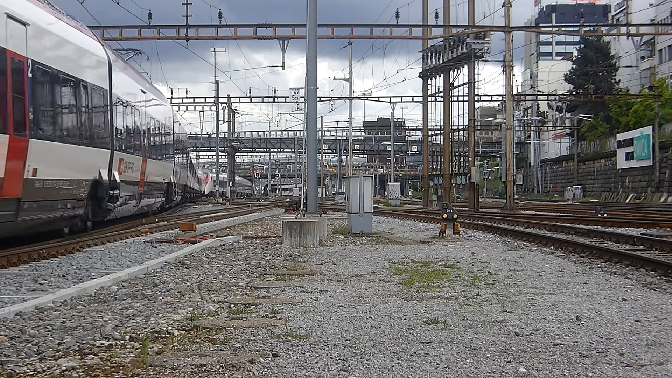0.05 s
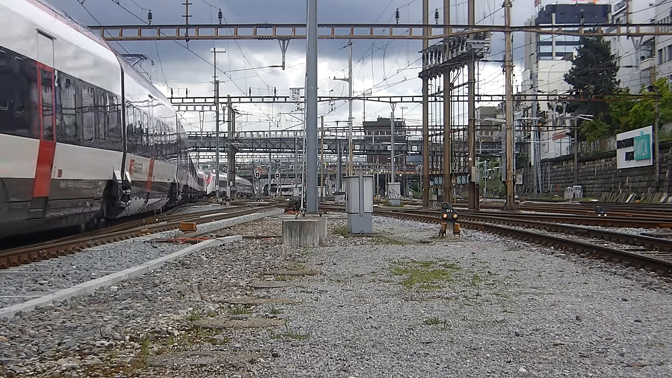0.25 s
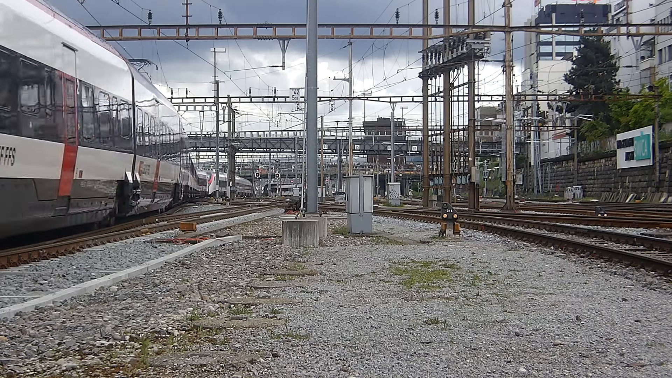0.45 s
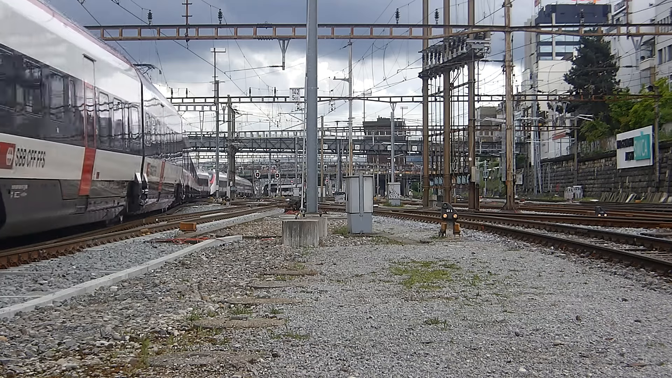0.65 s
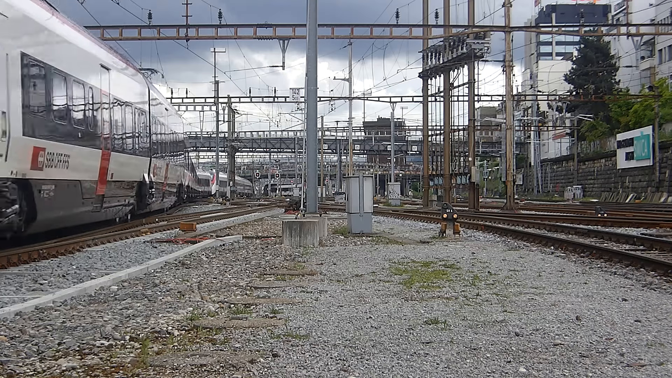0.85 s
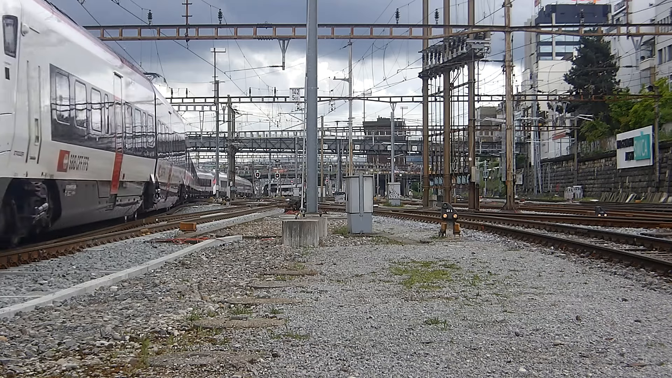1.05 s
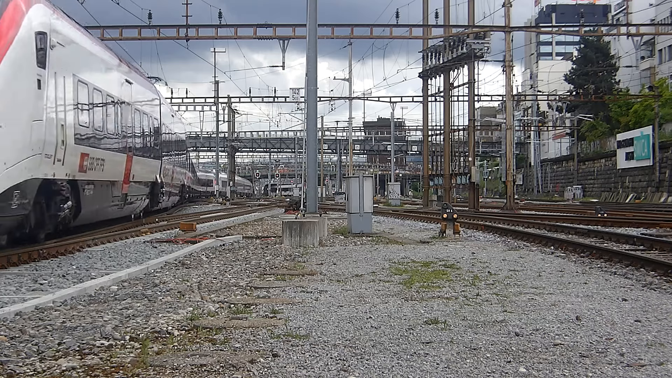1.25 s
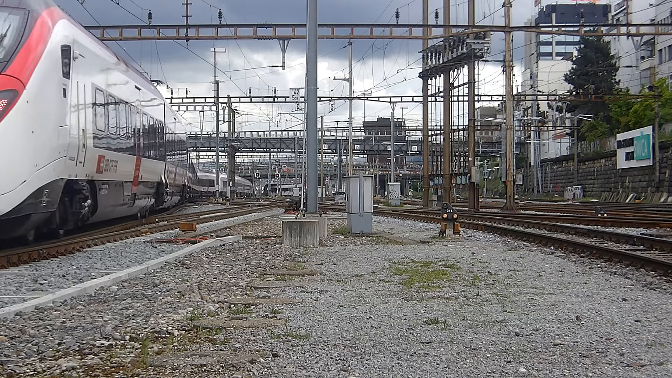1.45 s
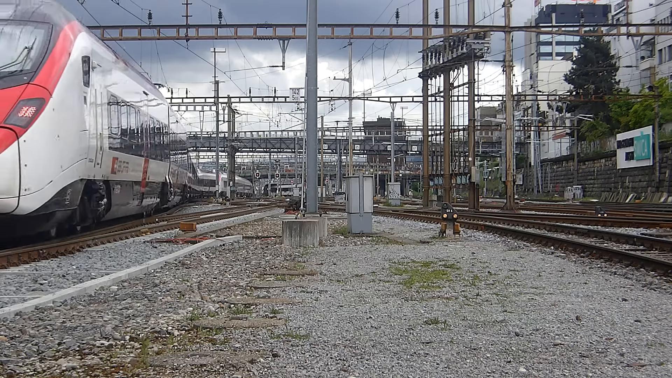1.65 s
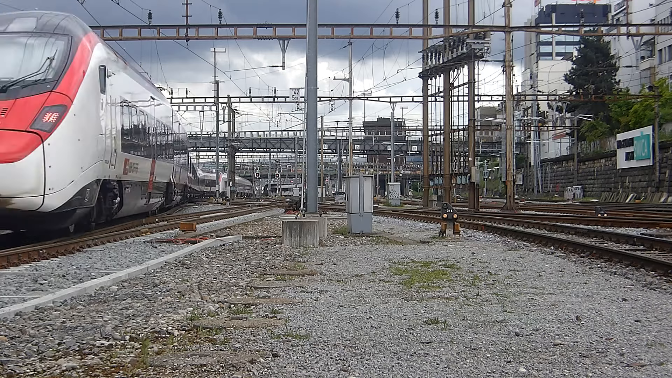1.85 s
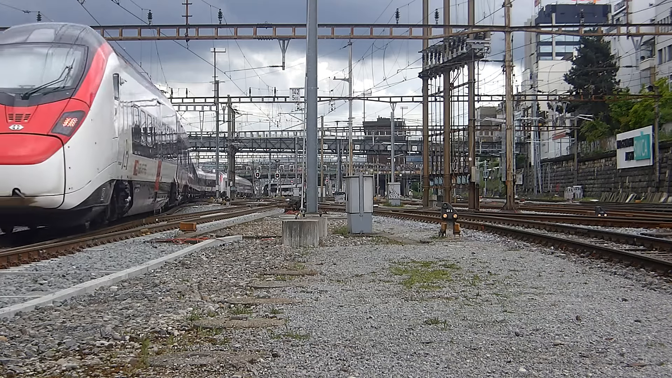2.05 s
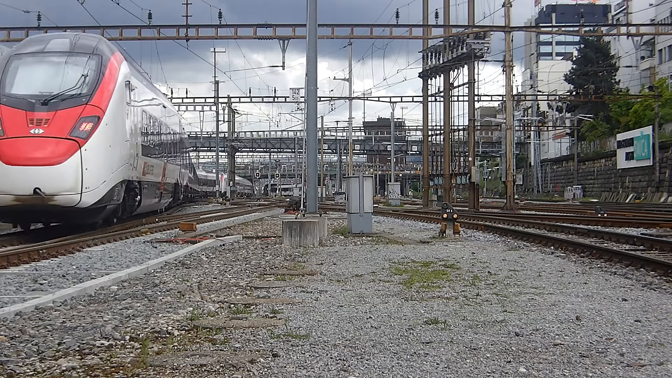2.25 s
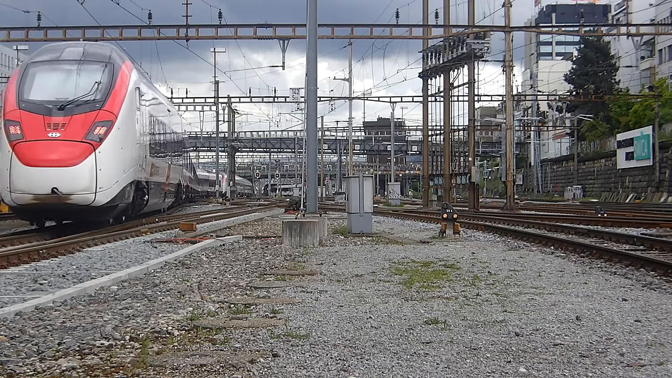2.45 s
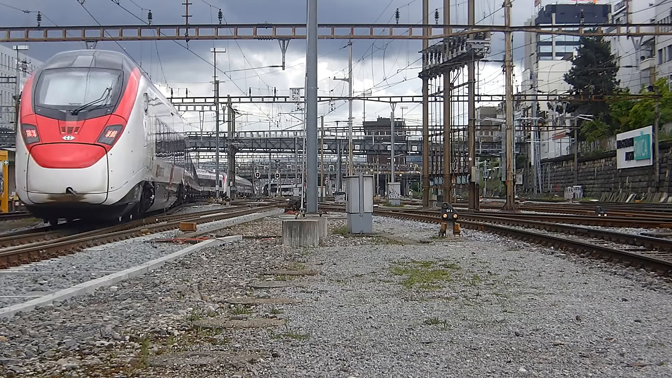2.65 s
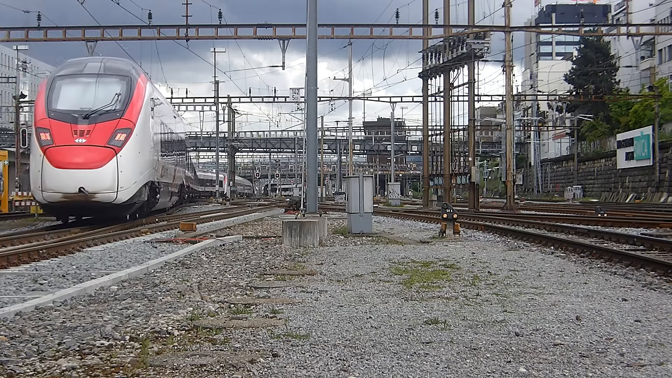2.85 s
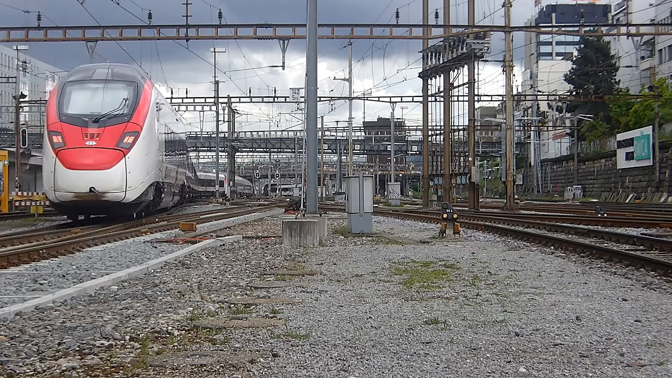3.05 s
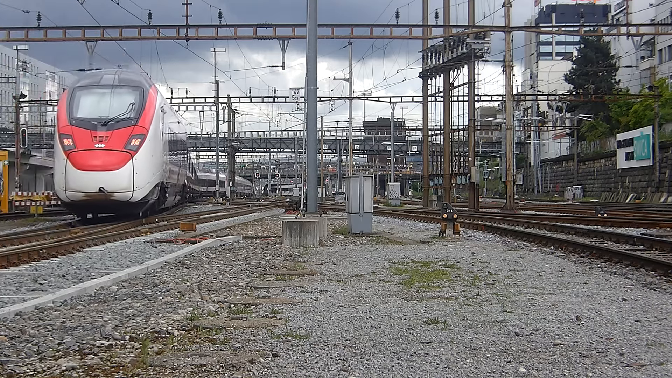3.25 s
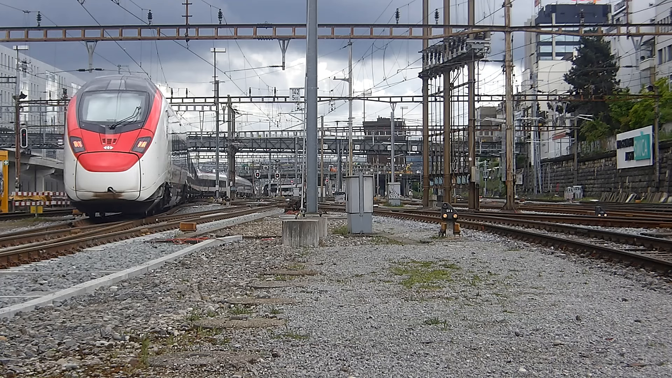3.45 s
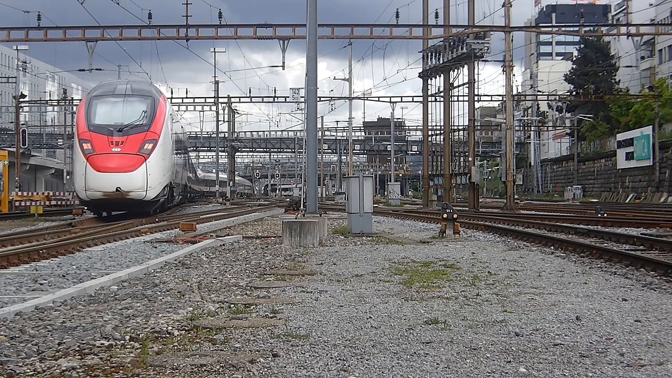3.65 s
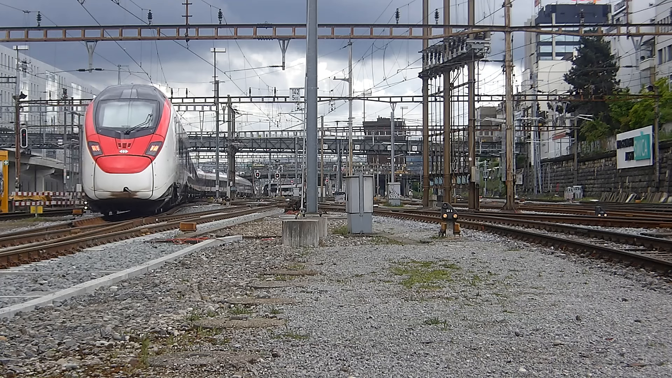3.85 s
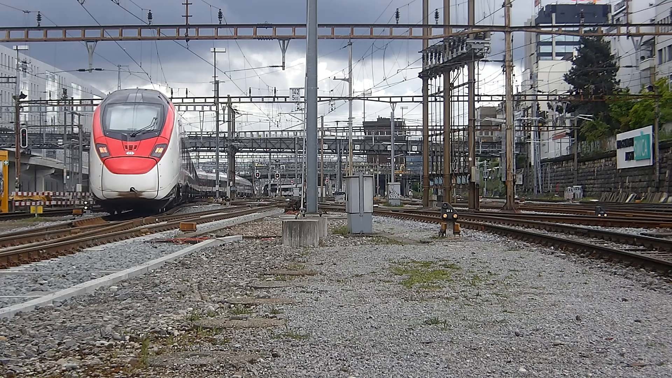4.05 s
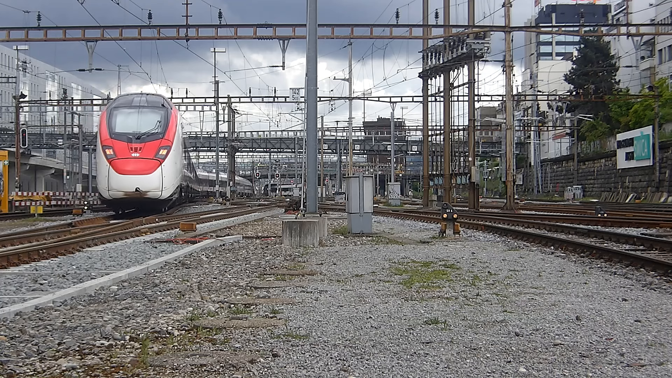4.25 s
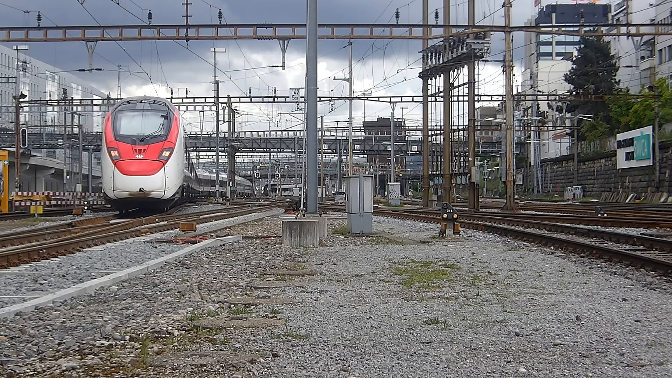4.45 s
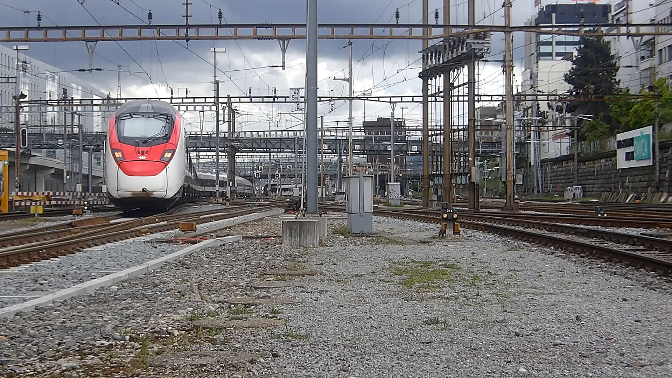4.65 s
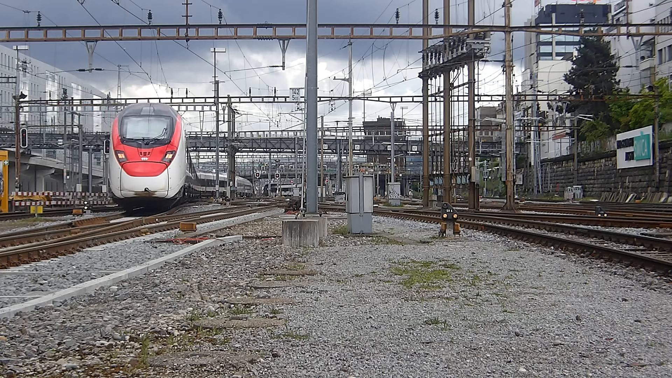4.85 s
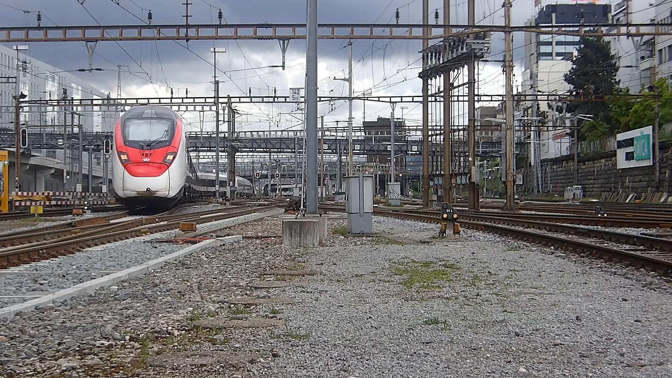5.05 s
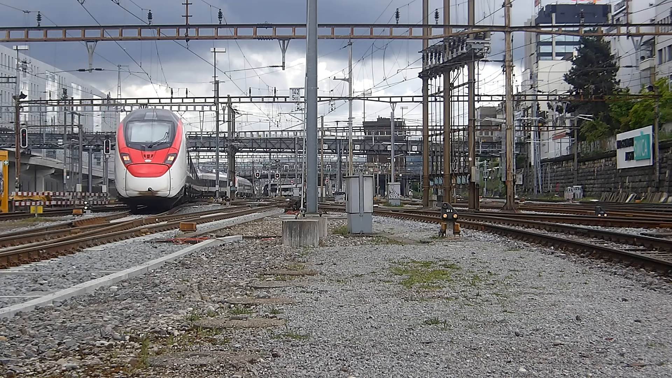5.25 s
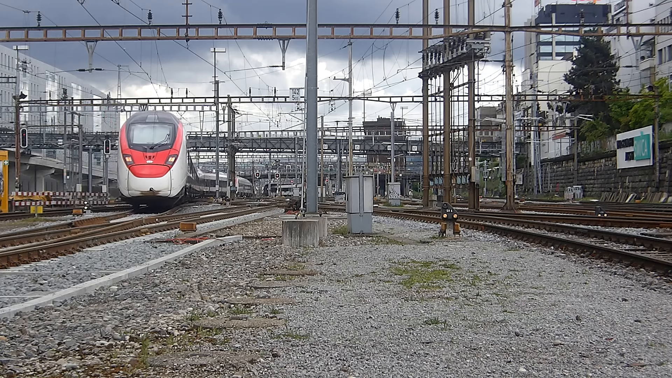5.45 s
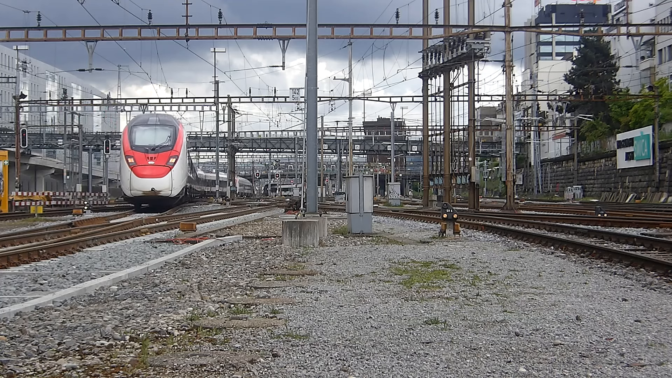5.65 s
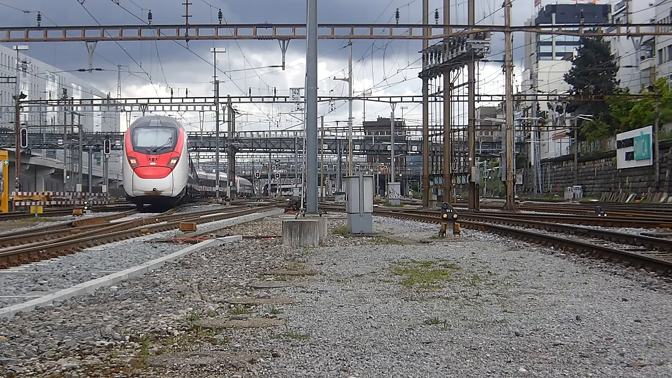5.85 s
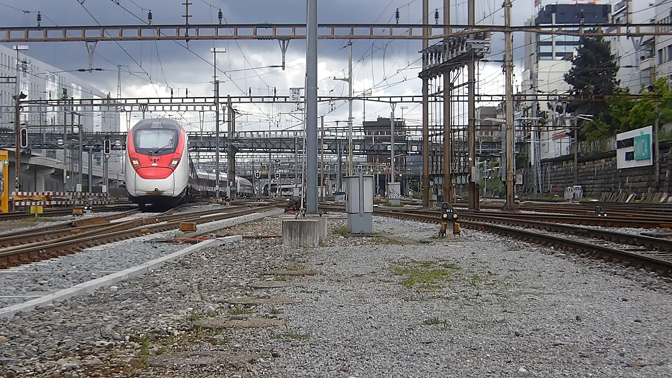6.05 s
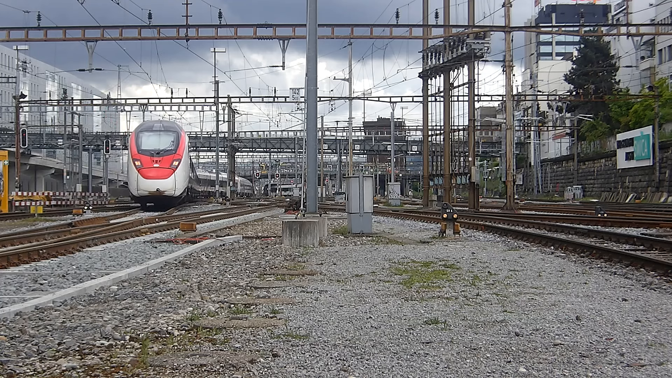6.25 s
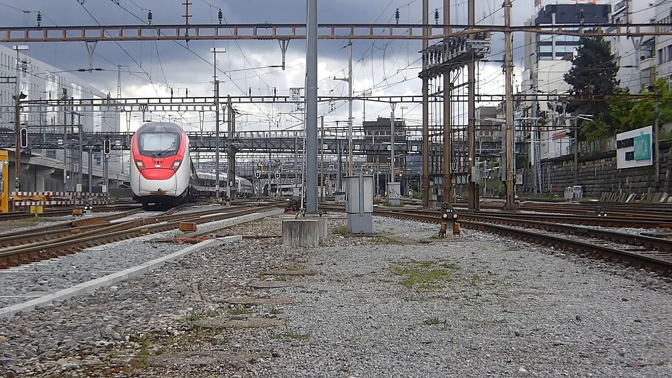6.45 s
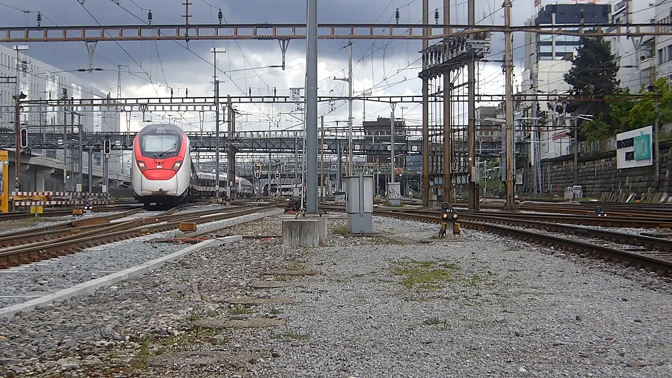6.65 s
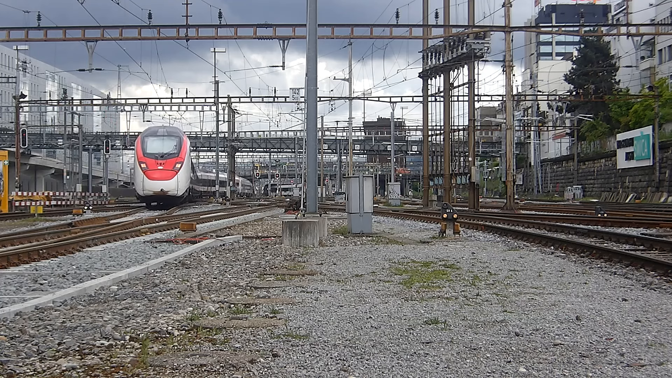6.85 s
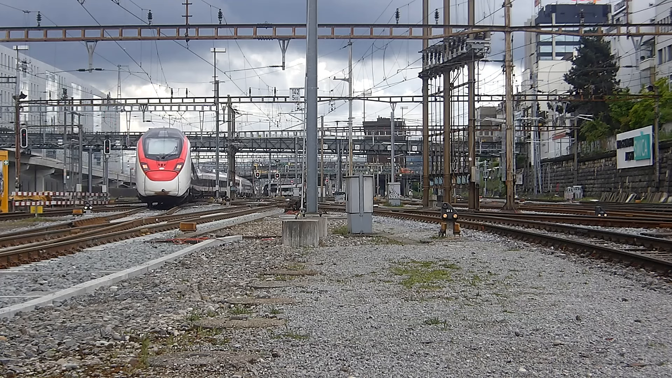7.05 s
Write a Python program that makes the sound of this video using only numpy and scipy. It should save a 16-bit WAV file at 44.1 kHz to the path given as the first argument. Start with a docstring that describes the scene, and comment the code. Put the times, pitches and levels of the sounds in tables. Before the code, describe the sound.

Close outdoors in a rail yard, a train leaves with its wheels shrieking and ringing against curved rails over a rough rumble. A rapid clatter of thuds and clacks comes almost at once, another near three seconds. The squeal drops briefly, returns in a shorter burst around four seconds, then dies away to low rolling noise and faint hiss. Fixed trackside microphone, same sound in both channels.

```python
"""A station yard with curved points, where an electric passenger train rolls close by and draws away.
Flanges grind on the rail as patchy coloured noise; steel wheels ring and shriek as friction-driven modes.
Rough treads rumble underneath, and single modes now and then sing out as purer squeals.
Axles thud and clack over joints with echoes from the yard; distant blows come along the rail as
falling chirps, all over a faint even hiss."""
import sys
import numpy as np
from scipy import signal
from scipy.fft import rfft, irfft
from scipy.io import wavfile
from scipy.ndimage import uniform_filter1d

SR = 44100
rng = np.random.default_rng(int(sys.argv[2]) if len(sys.argv) > 2 else 0)


def wav_record(signal):
    """Record a signal, one row per channel, as 16-bit PCM in the file named by sys.argv[1]."""
    frames = np.transpose(np.atleast_2d(signal))
    bounded = np.clip(frames, -1, 1)
    # unit amplitude maps onto the largest positive 16-bit level
    quanta = np.round(bounded * 32767).astype(np.int16)
    wavfile.write(sys.argv[1], SR, quanta)


N = 313110
TIME = np.arange(N) / SR

# a flange presses on the rail: [start t/s, end t/s, easing off from start to end/dB (negative swells),
# rasp level/dB, hiss level/dB, fizz level/dB, ring level/dB, top ring level/dB, shriek level/dB]
FLANGE_CONTACTS = [(-0.3, 0.42, -1, -30.5, -36.5, -34.5, -28.5, -28.5, -17.5),
                   (0.33, 0.44, -5, -32.5, -30, -29.5, -24, -18, -41),
                   (0.40, 2.797, 0, -30.5, -38, -33, -25.5, -29, -21.5),
                   (2.15, 3.305, 3, -31, -66, -55.5, -31, -29, -30),
                   (3.81, 3.93, -12.5, -32.5, -55, -39, -50, -50, -40),
                   (3.874, 4.65, 9, -27.5, -38.5, -39, -25.5, -31, -31),
                   (4.05, 4.967, 6, -29, -41, -65, -29.5, -29.5, -32.5)]
# how contacts die away once the flange lets go: [f/Hz, t60/s]
RELEASE_TIMES = [(2000, 1.93), (5500, 1), (9500, 0.77), (14000, .85)]
# where rasp, hiss and fizz are centred: [f/Hz]
GRIND_CENTRES = [2770, 6000, 13350]
# colour of the grinding, added to the contact levels: [f/Hz, level per Hz/dB]
GRIND_TINT = [(600, -61), (1300, -40), (1620, -45.5), (1850, -33), (3100, -34.5), (4200, -35), (6100, -33),
              (7300, -32), (8200, -41), (8700, -27), (10500, -27), (12200, -29), (13500, -37), (15700, -45)]
# modes of the wheel discs: [f/Hz, width/Hz, level relative to the drive/dB]
WHEEL_MODES = [(392.2, 8.3, -11), (574.3, 20, -14), (1009.3, 50, -2.5), (2007, 100, 7), (2920, 250, -10),
               (3684, 140.4, -7.5), (4655, 181, -7), (5657, 170, -7.5), (6644, 147, -4), (7590, 160, -12),
               (8650, 200, -6.5), (10450, 210, -7), (11370, 210, -12.5), (12350, 130, -20),
               (13000, 100, -26), (13965, 30, -26), (15080, 31, -47.5)]
# where low modes end, middle ones begin and end, and top ones begin: [f/Hz]
RING_ZONES = [1950, 2905, 6900, 8400]
# drive of the wheel modes from plain rolling: [f/Hz, level/dB]
ROLLING_DRIVE = [(1000, -47), (2000, -62), (3650, -43), (4660, -46.5), (5650, -51.5), (6600, -59),
                 (7600, -68), (8600, -83)]
# cluster of close modes in the shriek: [f/Hz, width/Hz, relative level/dB]
SHRIEK_MODES = [(9418, 8.6, -7), (9476, 20, -5), (9570, 195, -3), (9630, 25, -9), (9750, 25, -13)]
# one wheel mode catches and sings out: [peak t/s, time from peak to half amplitude t/s, f/Hz, level/dB]
SQUEAL_EVENTS = [(0.394, .04, 382, -28.5), (0.45, 0.166, 988, -35), (0.483, 0.153, 9450, -22.5),
                 (0.517, 0.1, 4653, -23.5), (0.559, 0.25, 5663, -24), (0.625, 0.066, 574, -34.5),
                 (0.784, 0.12, 1015, -38.5), (.9, 0.43, 2060, -37.5), (1.05, 0.55, 6620, -31.5),
                 (1.472, 0.14, 5630, -28), (2.2, 0.36, 6540, -30.5), (2.415, 0.84, 2949, -32),
                 (2.5, 0.55, 3645, -33), (2.525, .2, 994, -40.5), (2.92, .25, 5650, -34.5),
                 (2.993, 0.13, 1000, -36), (3.3, 0.046, 6660, -30.5), (3.929, 0.057, 2900, -38),
                 (4.037, 0.071, 4656, -25), (4.25, 0.11, 7670, -34), (4.313, 0.22, 5650, -29.5),
                 (4.335, 0.28, 991.5, -34), (4.337, 0.099, 3650, -28.5), (4.462, 0.35, 1993, -32),
                 (4.696, 0.088, 4650, -31), (4.707, 0.15, 3630, -30), (5.795, 1, 1003, -47.5),
                 (6.202, 0.55, 6650, -56), (6.56, 0.071, 1000, -44), (6.85, 0.26, 4664, -51)]
# course of the rolling noise: [t/s, level/dB]
ROLLING_LEVEL = [(0.0, -36), (0.25, -39), (0.5, -38), (0.97, -45.5), (1.72, -41.5), (2.65, -45),
                 (3.05, -38), (3.7, -39.5), (4.4, -41.5), (7.1, -43)]
# colour of the rumble, added to that course: [f/Hz, level per Hz/dB]
RUMBLE_TINT = [(25, -54.5), (50, -44), (80, -36.5), (115, -37.5), (200, -24), (310, -27.5), (420, -26),
               (750, -30), (1250, -31.5), (1700, -32.5), (2500, -38), (4200, -46), (7800, -71.5),
               (9400, -54.5), (15000, -77)]
# wheels striking joints and points: [t/s, thud level/dB, thud f/Hz, clack level/dB]
JOINT_BLOWS = [(.309, -16, 490, -42), (.322, -21, 420, -27), (.336, -18.5, 290, -35),
               (0.356, -22.5, 576, -42), (.372, -19, 528, -29), (0.387, -23, 407, -21.5),
               (0.412, -26, 390, -23.5), (0.429, -24, 407, -24.5), (.534, -32, 312, -49),
               (2.946, -21, 457, -17.5), (2.955, -20, 727, -24), (2.968, -31, 650, -29),
               (2.987, -32, 800, -22), (3.014, -29, 800, -18.5), (3.026, -34, 595, -25),
               (3.05, -43, 498, -32), (3.486, -33.5, 252, -55), (3.626, -52, 520, -29.5),
               (3.660, -42, 511, -29), (3.695, -48, 530, -30.5)]
# track modes in the thud: [f/Hz, width/Hz, relative level/dB]
THUD_MODES = [(269, 22, -2), (390, 13, -4), (543, 110, 5), (895, 350, 1.5)]
# track modes in the steel clack: [f/Hz, width/Hz, relative level/dB]
CLACK_MODES = [(2020, 550, 0.5), (2470, 85, 0.5), (2714, 29, -2.5), (2950, 540, -2.5), (3200, 45, -5)]
# distant blows heard through the rail: [t/s, level/dB, time constant of the fall t/s]
RAIL_CHIRPS = [(3.829, -57, 0.044), (5.56, -57, .15), (5.598, -55, 0.16)]

# friction builds up quickly, the wheel's ringing more slowly
GRIND_RISE_S, RING_RISE_S = 0.064, 0.18
# the rail carries treble fastest: a note two octaves under FIRST_HZ starts LAG_S later
FIRST_HZ, LAG_S = 14600, 0.045
# the lowest modes take this much less from the flange than the middle ones
LOW_MODES_DB = -26
# the contact point wanders and feeds each mode more or less
DRIFT_DB, DRIFT_HZ = 0.9, 2.4
# ringing from plain rolling fades once the last coach has drawn away
AWAY_S, AWAY_DB_PER_S = 6, 3
# a squeal is a thin line in a blur: the blur takes this share of the mode's usual width,
# and its level is relative to the line
LINE_WIDTH_HZ, BLUR_WIDTH_SHARE, BLUR_DB = 16.4, 0.7, 1
# cutoff of the clack's low-pass
CLACK_TOP_HZ = 4140
FLOOR_DB, EDGE_HZ = -59, 15750


def gain_of(db):
    """Turns decibels into an amplitude factor."""
    return 10 ** (np.asarray(db) / 20)


def evened(x):
    """Scales a signal to an rms of one."""
    return x / np.sqrt(np.mean(x ** 2) + 1e-20)


def read(points, hz):
    """Reads a curve over frequency on a logarithmic axis."""
    f, value = np.transpose(points)
    return np.interp(np.log(hz + 1), np.log(f + 1), value)


def add(mix, s, sound):
    """Mixes a sound in at time s, cut off at the end of the mix."""
    part = mix[max(round(s * SR), 0):][:len(sound)]
    part += sound[:len(part)]


def wander(rate_hz):
    """Slow random drift of rms one, rolling off above the given rate."""
    control_rate, size = 500, 4096
    hz = np.fft.rfftfreq(size, 1 / control_rate)
    spectrum = rfft(rng.standard_normal(size)) / (1 + (hz / rate_hz) ** 2)
    slow = irfft(spectrum)
    return evened(np.interp(TIME, np.arange(size) / control_rate, slow))


def resonate(x, hz, width):
    """One resonance; a second, wider pass steepens its far skirts."""
    for band in (width, 8 * width):
        b, a = signal.iirpeak(min(hz, SR / 2 - 1), hz / min(band, SR / 8), SR)
        x = signal.lfilter(b, a, x)
    return x


def noise(field_db, patchy_db, flicker_db, size):
    """Noise whose dB per Hz follow field_db(t, hz), with drifting patches and a shared flicker."""
    hop = size // 4
    t = np.arange(N // hop + 5) * hop / SR
    hz = np.fft.rfftfreq(size, 1 / SR)
    real, imaginary, patches = rng.standard_normal((3, len(t), len(hz)))
    patches = uniform_filter1d(patches, size=10, axis=0)
    patches = evened(uniform_filter1d(patches, size=7, axis=1))
    flicker = evened(uniform_filter1d(rng.standard_normal((len(t), 1)), size=4, axis=0))
    level_db = field_db(t, hz) + patchy_db * patches + flicker_db * flicker
    frames = (real + 1j * imaginary) * gain_of(level_db)
    sound = signal.istft(frames.T, nperseg=size, noverlap=size - hop)[1][:N]
    return sound * np.sqrt(SR / size)


def pressed(t, hz, start, end, easing_db, rise_s):
    """Gain of one flange contact: it sets in treble first, eases off along its length, and rings out."""
    arrival = start + LAG_S * (np.sqrt(FIRST_HZ / np.maximum(hz, 3000)) - 1)
    attack = np.clip((t - arrival) / rise_s, 0, 1) ** 2
    hold_db = easing_db * np.interp(t, [start, end], [0.5, -0.5])
    release_db = -60 * np.maximum(t - end, 0) / read(RELEASE_TIMES, hz)
    return attack * gain_of(hold_db + release_db)


def grinding():
    """Flanges scrape the rail head; the powers of all contacts add."""
    def field_db(t, hz):
        power = 0
        for start, end, easing_db, rasp_db, hiss_db, fizz_db, *_ in FLANGE_CONTACTS:
            scrape_db = np.interp(hz, GRIND_CENTRES, [rasp_db, hiss_db, fizz_db])
            pressure = pressed(t[:, None], hz, start, end, easing_db, GRIND_RISE_S)
            power = power + (gain_of(scrape_db) * pressure) ** 2
        return 10 * np.log10(power + 1e-20) + read(GRIND_TINT, hz)
    return noise(field_db, patchy_db=1.46, flicker_db=0.5, size=512)


def rubbed(hz, width, flutter_db):
    """A mode driven by stick and slip: friction caps its swing, so its strength only flutters."""
    tone = resonate(rng.standard_normal(N), hz, width)
    swing = np.sqrt(abs(uniform_filter1d(tone ** 2, size=3000)) + 1e-20)
    return evened(tone / swing * gain_of(flutter_db * wander(rate_hz=6.3)))


def wheel_voice(hz, width):
    """Many wheels blur a mode; the nearest few, each worn a little differently, add thin lines."""
    nearest = np.zeros(N)
    for side in (-1, 0, 1):
        line = rubbed(hz + side * 0.441 * width, 0.051 * width, flutter_db=3.5)
        nearest += gain_of(-5 * abs(side)) * line
    blur = rubbed(hz, width, flutter_db=2.0)
    return evened(blur + gain_of(-4.5) * evened(nearest))


def wheels():
    """Rolling rings the wheel discs faintly, a pressing flange loudly; the powers of both add."""
    t, out = TIME[::100], np.zeros(N)  # coarse time grid for the slow envelopes
    away_db = -AWAY_DB_PER_S * np.maximum(t - AWAY_S, 0)
    for hz, width, db in WHEEL_MODES:
        power = gain_of(read(ROLLING_DRIVE, hz) + away_db) ** 2
        for start, end, easing_db, *_, ring_db, top_db, _ in FLANGE_CONTACTS:
            zone_levels = [ring_db + LOW_MODES_DB, ring_db, ring_db, top_db]
            drive = gain_of(np.interp(hz, RING_ZONES, zone_levels))
            power += (drive * pressed(t, hz, start, end, easing_db, RING_RISE_S)) ** 2
        envelope = np.interp(TIME, t, np.sqrt(power))
        drift_db = DRIFT_DB * wander(rate_hz=DRIFT_HZ)
        out += gain_of(db + drift_db) * envelope * wheel_voice(hz, width)
    return out


def shriek():
    """The piercing top squeal: close modes of several wheels beat against each other."""
    cluster = sum(gain_of(db) * rubbed(hz, width, flutter_db=3.0) for hz, width, db in SHRIEK_MODES)
    lowest_hz = SHRIEK_MODES[0][0]
    power = np.zeros(N)
    for start, end, easing_db, *_, db in FLANGE_CONTACTS:
        power += (gain_of(db) * pressed(TIME, lowest_hz, start, end, easing_db, RING_RISE_S)) ** 2
    return np.sqrt(power) * evened(cluster)


def squeals():
    """Stick and slip locks on to one mode of one wheel: a purer tone swells and fades."""
    out, widths = np.zeros(N), np.array(WHEEL_MODES)[:, :2]
    for s, half_length, hz, db in SQUEAL_EVENTS:
        line = rubbed(hz, LINE_WIDTH_HZ, flutter_db=1.1)
        blur_width = BLUR_WIDTH_SHARE * read(widths, hz)
        blur = evened(resonate(rng.standard_normal(N), hz, blur_width))
        voice = evened(line + gain_of(BLUR_DB) * blur)
        swell = np.exp2(-((TIME - s) / half_length) ** 2)
        out += gain_of(db) * swell * voice
    return out


def rolling():
    """Rough treads on rough rail: a broad rumble whose deep bass hardly changes as the train leaves."""
    def field_db(t, hz):
        s, course_db = np.transpose(ROLLING_LEVEL)
        level_db = np.interp(t, s, course_db)[:, None]
        steadiness = np.interp(hz, [70, 220], [0.8, 0])
        steadied_db = level_db + steadiness * (level_db.mean() - level_db)
        return steadied_db + read(RUMBLE_TINT, hz)
    return noise(field_db, patchy_db=1.5, flicker_db=0.5, size=2048)


def bump(hz, cycles=1.48):
    """The heavy axle drops onto its sleeper: a few low cycles that swell and die."""
    turns = hz * np.arange(SR // 4) / SR
    swell = turns / cycles * np.exp(1 - turns / cycles)
    return np.sqrt(2) * swell * np.sin(2 * np.pi * turns)


def blow(modes, contact_s):
    """A brief rattling contact rings a set of modes; its loudest moment has an rms of one."""
    t = np.arange(SR // 4) / SR
    forces = rng.standard_normal((len(modes), len(t))) * np.exp(-t / contact_s)
    ring = np.zeros(len(t))
    for force, (hz, width, db) in zip(forces, modes):
        ring += gain_of(db) * evened(resonate(force, hz, width))
    return ring / np.sqrt(uniform_filter1d(ring ** 2, size=220).max())


def joints():
    """Each blow thuds in the sleepers and clacks in the steel."""
    out = np.zeros(N)
    b, a = signal.butter(2, CLACK_TOP_HZ, fs=SR)
    for s, thud_db, thud_hz, clack_db in JOINT_BLOWS:
        thud = 0.8 * bump(thud_hz) + 0.4 * blow(THUD_MODES, contact_s=0.005)
        clack = signal.lfilter(b, a, blow(CLACK_MODES, contact_s=0.0047))
        add(out, s, gain_of(thud_db) * thud + gain_of(clack_db) * clack)
    return out


def yard(x, t60=0.5):
    """Scattered echoes from the coaches, masts and retaining wall, dying away by 60 dB in t60 seconds."""
    t = np.arange(SR) / SR
    scattered = rng.standard_normal(SR) * (rng.random(SR) < 2000 / SR)  # about 2000 echoes a second
    taps = scattered * (t > 0.012) * gain_of(-60 * t / t60)
    return signal.fftconvolve(x, taps / np.linalg.norm(taps))[:N]


def chirps(start_hz=8750, rest_hz=6270):
    """The rail carries high notes fastest, so a far blow arrives as a falling whistle."""
    out = np.zeros(N)
    for s, db, fall_s in RAIL_CHIRPS:
        age = np.arange(0, 3 * fall_s, 1 / SR) / fall_s  # in time constants
        pitch_hz = rest_hz + (start_hz - rest_hz) * np.exp(-age)
        turns = np.cumsum(pitch_hz) / SR
        swell = age * np.exp(1 - age) * signal.windows.tukey(len(age), 0.2)
        blur = 1.6 * wander(rate_hz=43)[:len(age)]  # phase wobble in radians
        add(out, s, gain_of(db) * swell * np.sin(2 * np.pi * turns + blur))
    return out


def floor():
    """A faint even hiss: white noise at a constant level."""
    return gain_of(FLOOR_DB) * rng.standard_normal(N)


def scene():
    """Layers the train, its echoes and the hiss, alike in both channels."""
    knocks = joints()
    flanges = grinding() + wheels() + shriek() + squeals()
    track = rolling() + knocks + gain_of(-3) * yard(knocks) + chirps()
    mix = flanges + track + floor()
    return np.array([mix, mix])


def record(dry):
    """Deep bass is rolled off and a narrow notch is cut at 7850 Hz; then a steep low-pass limits the band."""
    thinned = signal.lfilter(*signal.butter(2, 40, "high", fs=SR), dry)
    notched = signal.lfilter(*signal.iirnotch(7850, 55, SR), thinned)
    band_limit = signal.firwin(1023, EDGE_HZ, window=("kaiser", 9), fs=SR)
    return signal.oaconvolve(notched, band_limit[None], "same")


dry = scene()
out = record(dry)
wav_record(out)
```